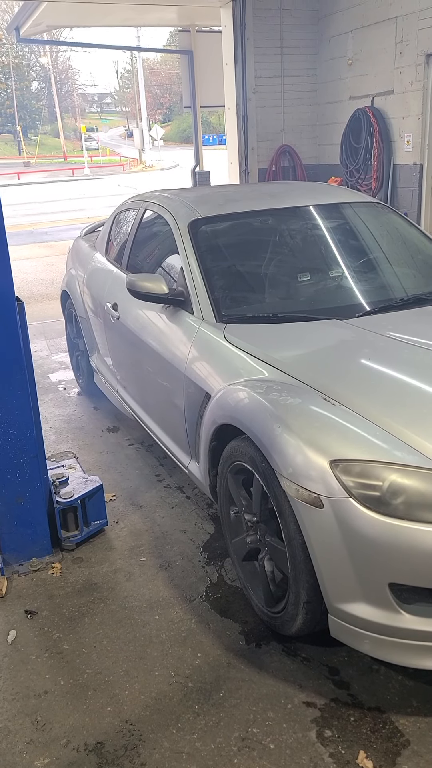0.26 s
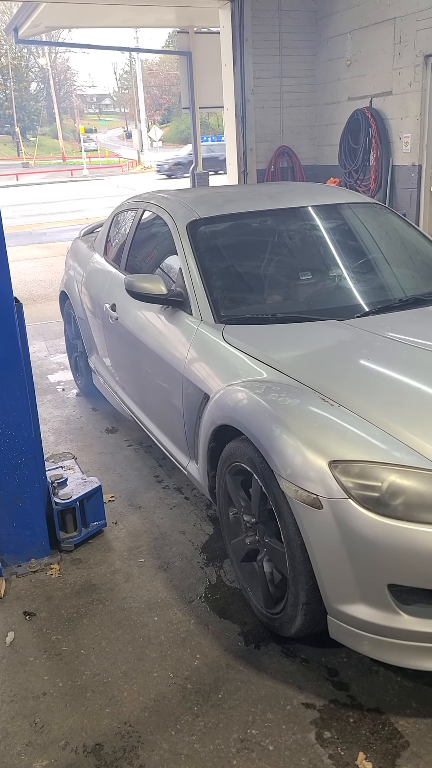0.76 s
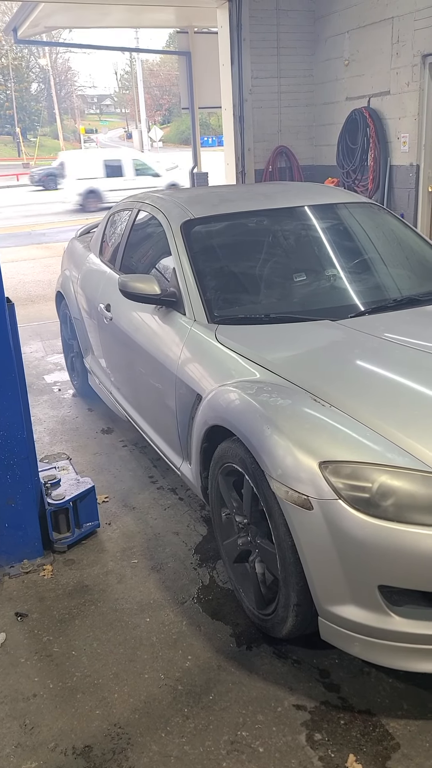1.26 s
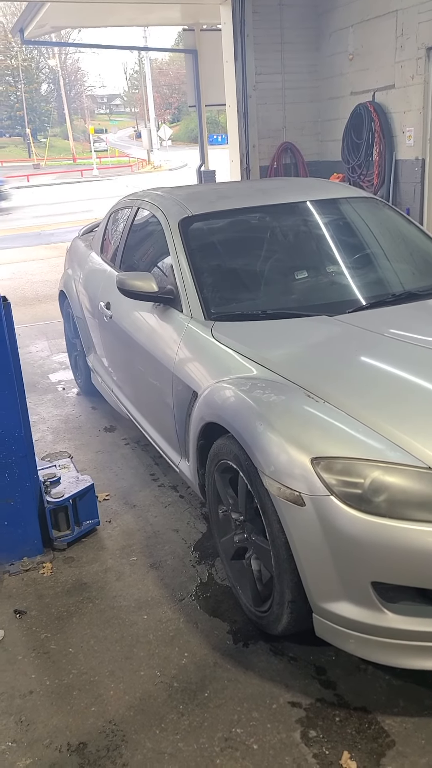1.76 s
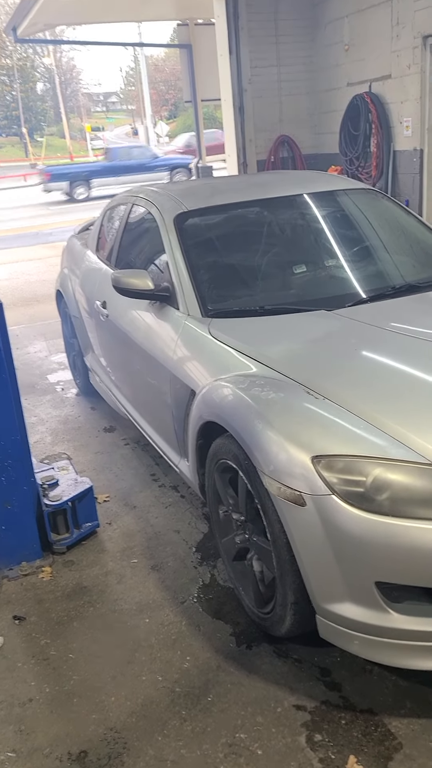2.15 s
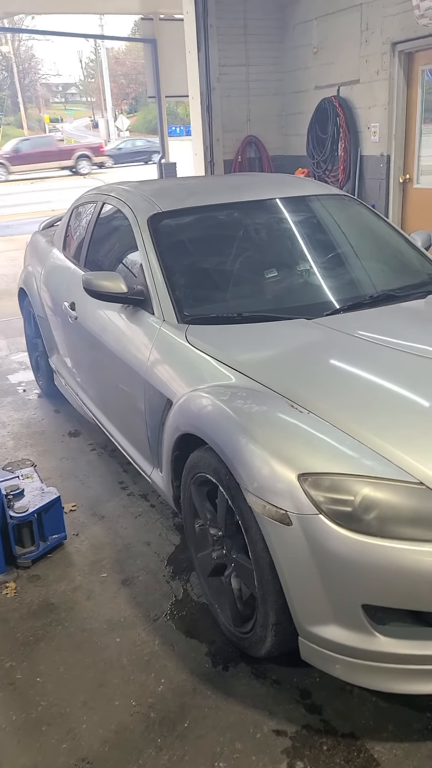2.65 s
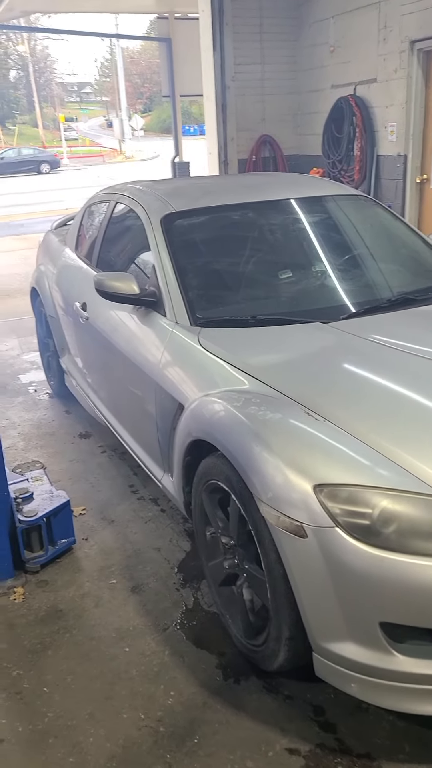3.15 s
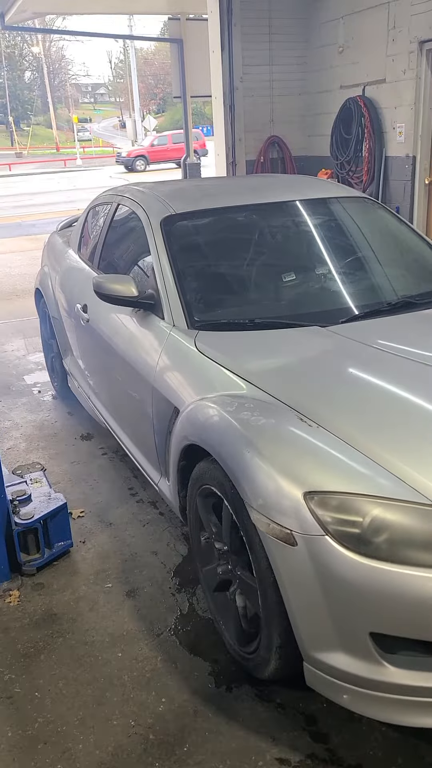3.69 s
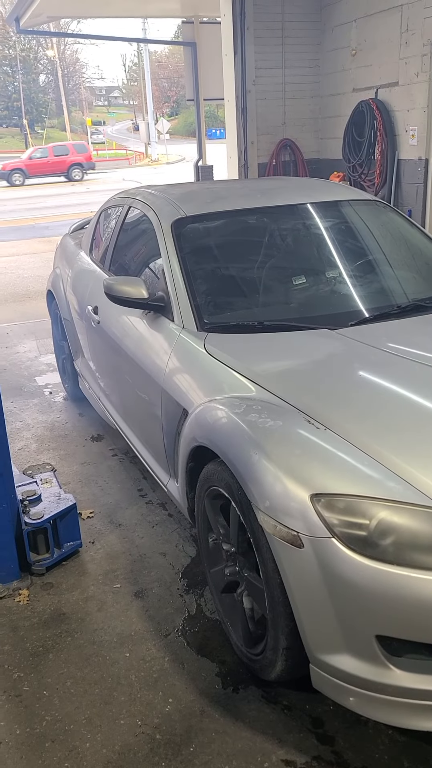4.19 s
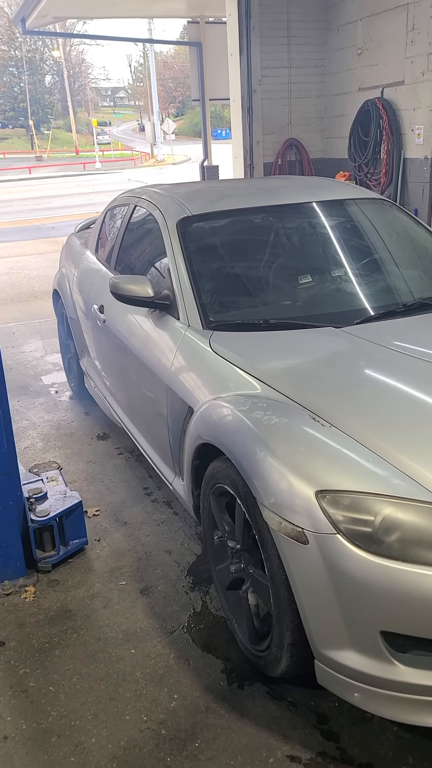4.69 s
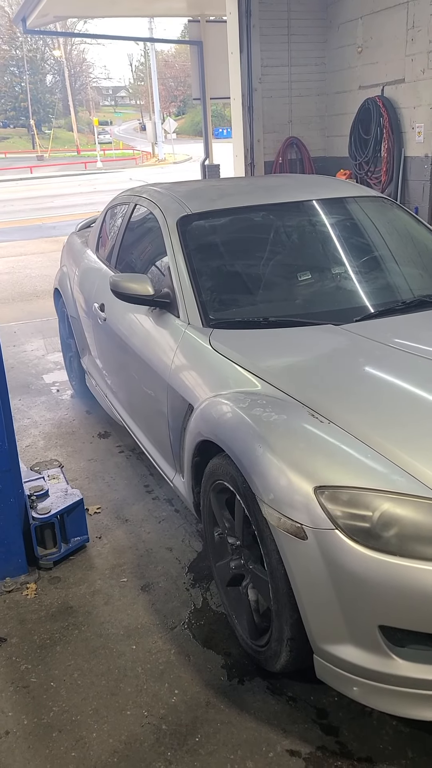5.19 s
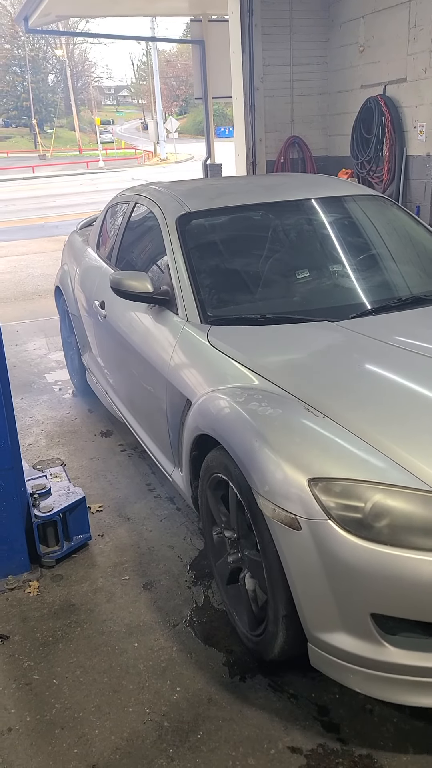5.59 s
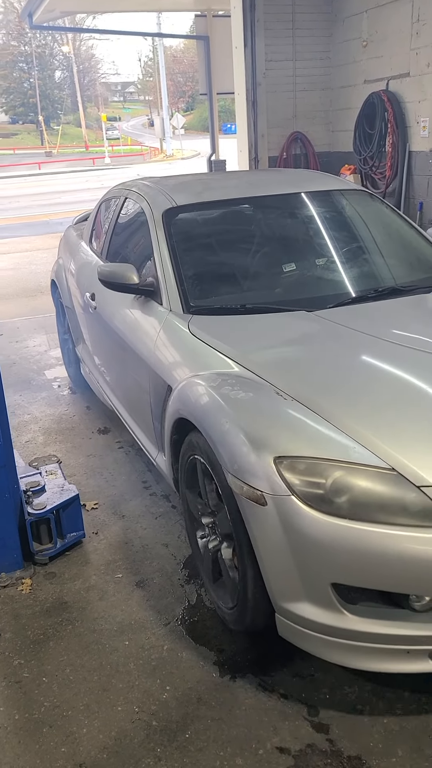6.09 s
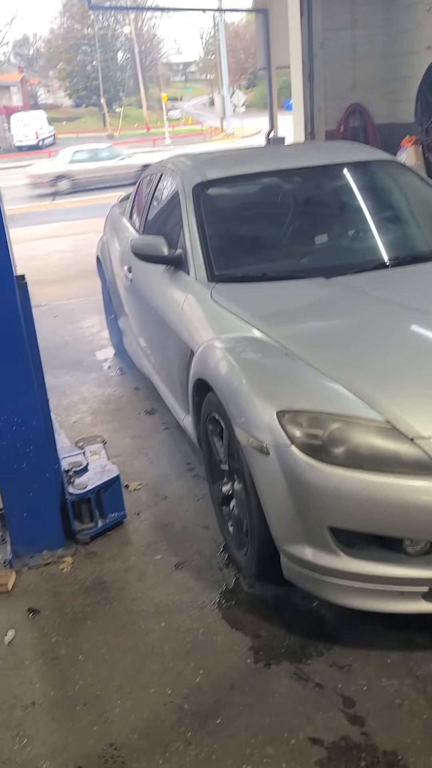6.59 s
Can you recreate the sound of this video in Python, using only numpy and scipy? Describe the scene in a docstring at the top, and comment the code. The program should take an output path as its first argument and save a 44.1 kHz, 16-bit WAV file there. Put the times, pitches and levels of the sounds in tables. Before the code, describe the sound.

A rotary car engine drones at fast idle in an echoing workshop, sags almost to a stall, then catches and settles into a throbbing low idle.

```python
"""A car engine with two rotors is heard at fast idle in a workshop with its door open.
The revs sag until it nearly stalls, then it catches itself and settles into a throbbing low idle.
Each firing sends a puff through the muffler, a sharp edge through the pipe and a burst of rough gas.
These are sums of tones and shaped noise; rushing air, clatter and rumble are noise, a belt adds a whine.
Engine speed times most layers, and the air drawn by the engine sets many of their levels."""
import sys
import numpy as np
from scipy import signal
from scipy.fft import rfft, irfft, next_fast_len
from scipy.io import wavfile
from scipy.ndimage import uniform_filter1d

SR = 44100
rng = np.random.default_rng(int(sys.argv[2]) if len(sys.argv) > 2 else 0)


def to_wav(sig):
    """Store sig (one row per channel, or 1-D mono) as 16-bit WAV at the path in sys.argv[1].

    Samples outside -1..1 are clipped; the rate is SR.
    """
    pcm = np.clip(np.atleast_2d(sig), -1, 1) * 32767
    pcm = np.round(pcm).astype(np.int16)
    wavfile.write(sys.argv[1], SR, pcm.T)  # frames by channels


N = 301644


def from_db(db):
    """Turn decibels into gain."""
    return 10 ** (np.asarray(db) / 20)


def rms_one(x):
    """Scale a sound to rms 1."""
    return x / np.sqrt(np.mean(x ** 2) + 1e-20)


def in_time(rows):
    """Read each column of a time table at every sample."""
    s, *columns = np.transpose(rows)
    return [np.interp(np.arange(N) / SR, s, c) for c in columns]


def at_hz(points, hz):
    """Read each column of a spectrum table on a log-frequency axis."""
    knots, *columns = np.transpose(points)
    return np.array([np.interp(np.log(hz + 1e-3), np.log(knots), c) for c in columns])


def bumps(rows, hz):
    """Add up the gains in dB of a table of peaks and dips."""
    return sum(peak_db / (1 + (2 * (hz - centre) / width) ** 2) for centre, peak_db, width in rows)


def per_firing(turn):
    """Draw a fresh random value for each firing, joined by straight lines."""
    return np.interp(turn + 1, np.arange(400), rng.standard_normal(400))


def wander(per_s, size=1):
    """Drift slowly at random, with new values per_s times a second, read at every size-th sample."""
    return np.interp(np.arange(0, N, size) / SR * per_s, np.arange(400), rng.standard_normal(400))


def puff(turn, sharpness):
    """Gas flow that jumps at each firing and dies away before the next; rms 1."""
    return rms_one(np.exp(-sharpness * (turn % 1)))


def lag_of(hz, centre_hz, width_hz):
    """Phase lag of a resonance: almost none well below it, nearly half a cycle well above it."""
    return np.arctan2(hz * width_hz, centre_hz ** 2 - hz ** 2)


# How alike the left and right channels are: (frequency [Hz], likeness [-1 to 1])
CHANNEL_LIKENESS = [(100, 0.4), (280, 1), (500, 0.6), (1000, -.1), (2500, 0)]
# Peaks and dips that the bonnet and the floor give to all noise:
# (frequency [Hz], gain [dB], width [Hz])
BONNET_REFLECTIONS = [(995, -6.5, 36), (1824, 3.5, 105), (2020, -6.5, 110), (2450, 2.5, 65), (3950, 1, 420),
                      (2580, -1, 230), (3120, 1.5, 250), (4710, 3.5, 140), (5330, 2.5, 260),
                      (5960, 0.5, 500), (7200, 3, 310)]
RIPPLE_DB, RIPPLE_STEP_HZ = 2.2, 30


def coloured_noise(spectrum):
    """Stereo noise of a given colour, finely rippled by wall echoes; rms 1."""
    size = next_fast_len(N)
    hz = np.arange(size // 2 + 1) * SR / size
    mid, side = rfft(rng.standard_normal((2, size)))
    alike = np.clip(at_hz(CHANNEL_LIKENESS, hz), -1, 1)
    both = np.sqrt(1 + alike) * mid + np.sqrt(1 - alike) * side * [[1], [-1]]
    ripple = np.interp(hz / RIPPLE_STEP_HZ, np.arange(1000), rng.standard_normal(1000))
    ripple = ripple * np.interp(hz, [500, 1200, 4000, 9000], [0, 1, 1, .4])
    colour_db = at_hz(spectrum, hz) + bumps(BONNET_REFLECTIONS, hz) + RIPPLE_DB * ripple
    return rms_one(irfft(both * from_db(colour_db), size)[:, :N])


# Engine speed: (time [s], firing rate [firings per s])
ENGINE_SPEED = [(0.0, 49.06), (0.2, 48.74), (0.55, 46.77), (0.85, 46.57), (1.1, 47.67), (2.15, 48.48),
                (2.4, 47.51), (2.55, 43.8), (2.7, 35.45), (2.85, 28.35), (3.05, 23.1), (3.2, 24.85),
                (3.45, 27.6), (3.75, 30.38), (4.0, 31.7), (4.4, 30.79), (4.8, 30.87), (5.3, 31.27),
                (5.85, 31.21), (6.3, 31.47), (6.84, 31.44)]
IDLE_RATE, FAST_RATE = 31, 47   # firings per s


def engine_motion():
    """Add up the speed into a count of firings; find how fast it idles and how quickly its revs change."""
    rate, = in_time(ENGINE_SPEED)
    turn = np.cumsum(rate) / SR - .587   # one turn per firing
    flow = np.clip((rate - IDLE_RATE) / (FAST_RATE - IDLE_RATE), 0, 1)   # 0 at low idle, 1 at fast idle
    rev_change = uniform_filter1d(np.abs(np.gradient(rate)) * SR, size=6000)   # firings per s, per s
    stumble = np.tanh((rev_change / 18) ** 2)   # 0 at steady revs, near 1 when they change fast
    return turn, rate, flow, stumble


# Air drawn by the engine: (time [s], relative level [dB])
AIR_DRAWN = [(0.06, -41), (0.97, -44), (1.72, -42), (2.31, -43.5), (2.35, -40.5), (2.69, -45.5),
             (2.84, -55), (3.12, -49), (3.28, -42.5), (3.69, -38.5), (6.75, -37.5)]


def air_drawn():
    """The flow of air in dB, which sets hiss, clatter, rasp, gas bursts and whine."""
    air_db, = in_time(AIR_DRAWN)
    return air_db


# Rumble of the workshop and the street outside: (frequency [Hz], relative level [dB])
RUMBLE_COLOUR = [(20, -39), (45, -21), (100, -72), (220, -8), (400, -5), (800, -31.5), (1600, -20),
                 (5000, -95)]


def rumble():
    """Steady, mostly low noise from the workshop and the street."""
    return from_db(-44) * coloured_noise(RUMBLE_COLOUR)


ROOM_T60_S = .7   # time for the echoes to fall by 60 dB


def room_tail(x):
    """The workshop rings on, as fading noise-like echoes, at pitches that the engine has just left."""
    t = np.arange(int(ROOM_T60_S * SR)) / SR
    response = rng.standard_normal(len(t)) * from_db(-60 * t / ROOM_T60_S)
    return signal.fftconvolve(x, response[None] / np.linalg.norm(response), axes=1)[:, :N]


# Whine of a belt-driven accessory: (multiple of its own rate, level at the strongest air flow [dB])
BELT_WHINE = [(2, -57.5), (3, -65)]
WHINE_PER_FIRING = 11.71   # accessory cycles per firing


def whine(turn, slip):
    """Faint tones of an accessory on a slightly slipping belt, with another phase on each side."""
    angle = 2 * np.pi * (WHINE_PER_FIRING * turn + slip * wander(per_s=12.0))
    sides = np.array([[0], [1]])   # phase [radians]
    return sum(np.sqrt(2) * from_db(db) * np.cos(k * angle + sides) for k, db in BELT_WHINE)


# Colour of the rushing air: (frequency [Hz], left relative level [dB], right relative level [dB])
AIR_COLOUR = [(1380, 10, 6), (1870, -8, 1.5), (2290, -2, 0), (2920, -2.5, -2.5), (4210, -0.5, 0.5),
              (4800, -4.5, -3), (6400, -1.5, -6), (7900, -1, -3), (9230, -6, 4.5), (11240, 0, -1.5),
              (12000, -15, 6.5), (12800, 2.5, -5.5), (13900, -7, -1), (15200, -3, -2)]


def hiss(turn, level_db, throb_db, edge_db, flutter_db, low_hz, dull_hz):
    """Air rushing through the engine, pulsing slightly with every stroke; weaker flow is duller."""
    pulsing_db = throb_db * np.cos(2 * np.pi * (turn - .35))
    pulsing_db += edge_db * np.cos(4 * np.pi * (turn - .25))
    pulsing_db += flutter_db * per_firing(turn)
    air = rms_one(high_pass(coloured_noise(AIR_COLOUR), low_hz) * from_db(pulsing_db))
    dull = signal.sosfilt(signal.butter(1, dull_hz, fs=SR, output="sos"), air)
    treble = air - dull
    return from_db(level_db) * (dull + from_db(level_db - level_db.max()) * treble)


def high_pass(x, hz):
    """Cut the lows steeply."""
    return signal.sosfilt(signal.butter(4, hz, "high", fs=SR, output="sos"), x)


# Engine-bay clatter: (frequency [Hz], relative level [dB])
CLATTER_COLOUR = [(150, 18), (450, 7.5), (900, 8), (1050, 7), (1250, 10), (1550, -6), (1800, 1),
                  (2030, 0.5), (2400, 2), (3200, -12), (5000, -25)]


def clatter(turn, throb, grain_db):
    """Mechanical noise of the engine bay, grainy and beating with the firings; rms 1."""
    count = N // 128 + 2   # a new grain every 128 samples
    grains = np.interp(np.arange(N) / 128, np.arange(count), rng.standard_normal(count))
    beat = 1 + throb * puff(turn, sharpness=1.6)
    return rms_one(coloured_noise(CLATTER_COLOUR) * beat * from_db(grain_db * grains))


# Swelling and sinking of the low treble: (time [s], gain [dB])
TREBLE_SWELL = [(0, -2), (.9, 1), (1.9, -1), (2.9, 0.5), (3.5, 1.5), (4.2, -0.5), (5.1, 1.5), (5.7, -2.5),
                (6.3, -0.5), (6.84, 0)]
SWELL_LOW_HZ, SWELL_HIGH_HZ = 1900, 4500


def swell(x):
    """Raise and lower the low treble of the engine-bay noise slowly."""
    swell_db, = in_time(TREBLE_SWELL)
    band_pass = signal.butter(1, [SWELL_LOW_HZ, SWELL_HIGH_HZ], "band", fs=SR, output="sos")
    return x + (from_db(swell_db) - 1) * signal.sosfilt(band_pass, x)


# Colour of the rough gas at the tailpipe: (frequency [Hz], relative level [dB])
GAS_COLOUR = [(150, -28), (300, -6), (470, 6.5), (600, -7.5), (800, -1), (1200, -10.5), (3000, -30)]
# Strength of the gas bursts, before the air flow's swing: (time [s], level [dB])
GAS_LEVEL = [(0, -53), (.4, -53), (1, -39), (2.3, -60), (2.5, -45), (2.72, -46), (2.95, -40), (3.25, -41),
             (3.85, -41), (4.5, -46.5), (6.84, -46.5)]


def chuff(turn, lead, sharpness, uneven_db):
    """A short burst of turbulence at the front of each pulse, each with a strength of its own."""
    level_db, = in_time(GAS_LEVEL)
    strength = from_db(uneven_db * np.clip(per_firing(np.floor(turn + lead)), -2, 2))
    bursts = rms_one(strength * puff(turn + lead, sharpness))
    return from_db(level_db) * coloured_noise(GAS_COLOUR) * bursts


# Half orders, there because the two rotors differ: (frequency [Hz], relative level of a partial [dB])
ROTOR_HALF_ORDERS = [(47, -92), (77, -39.5), (110, -48), (140, -49), (171, -48), (205, -54), (234, -37),
                     (265, -46), (296, -59), (318, -42.5), (359, -61), (390, -57), (421, -49.5), (452, -57),
                     (483, -51), (578, -60), (606, -48.5), (644, -55), (668, -53.5), (700, -53), (732, -51),
                     (765, -70), (830, -54.5), (940, -64), (1010, -71), (1095, -62.5), (1600, -97)]


def lope(turn, rate, flow, fast_db, count=8):
    """Low half orders: tones between the firing harmonics, as one rotor fires unlike the other."""
    out = 0
    for k in np.arange(1, count) + .5:
        level = from_db(at_hz(ROTOR_HALF_ORDERS, k * rate))
        out = out + level * np.cos(2 * np.pi * k * turn + rng.uniform(-np.pi, np.pi))
    return np.sqrt(2) * from_db(fast_db * flow) * out


# Upper whole orders, with peaks at the pipe's resonances: (frequency [Hz], relative level of a partial [dB])
PIPE_RESONANCES = [(205, -28), (240, -33.5), (265, -46.5), (282, -39.5), (312, -38), (343, -46.5),
                   (376, -42), (405, -65), (437, -48.5), (470, -45.5), (499, -62), (565, -50.5),
                   (625, -60.5), (760, -60.5), (860, -56), (965, -58), (1020, -68.5), (1600, -92)]
# A standing wave lifts or lowers the upper partials near one pitch:
# (time [s], frequency [Hz], gain [dB])
SINGING_PARTIAL = [(0.5, 490, 2.5), (0.9, 490, 8), (1.15, 500, -1), (1.6, 600, 4), (2.3, 610, 3),
                   (2.6, 603, -2), (4.1, 603, -2), (5.0, 607, 2), (5.95, 606, 4), (6.12, 644, 10),
                   (6.45, 645, 10), (6.84, 645, 7)]
SINGING_WIDTH_HZ = 25


def rasp(turn, rate, flow, stumble, jitter, bright_db, uneven_db, swell_db, diffuse_hz, width,
         count=76, size=10):
    """The sharp edge of each pulse: upper whole and half orders, coloured by the pipe."""
    strength = from_db(uneven_db * per_firing(turn))
    turn = turn + jitter * per_firing(turn)   # uneven timing blurs the highest partials most
    curves = (turn, rate, flow, stumble, *in_time(SINGING_PARTIAL))
    turn, rate, flow, stumble, singing_hz, singing_db = (c[::size] for c in curves)   # coarser, for speed
    out = 0
    for half in range(17, count):
        hz = half / 2 * rate
        diffuse = np.clip((hz / diffuse_hz) ** 3 + stumble, 0, 1)   # wall echoes scramble the higher partials
        lift_db = bumps([(singing_hz, singing_db, SINGING_WIDTH_HZ)], hz)
        # a strong standing wave is alike on both sides
        apart = width * rng.uniform(-1.08, 1) * from_db(-np.maximum(lift_db, 0))
        scramble = rng.uniform(-np.pi, np.pi) + apart * np.array([[1], [-1]])
        table = ROTOR_HALF_ORDERS if half % 2 else PIPE_RESONANCES
        level_db = at_hz(table, hz) + bright_db * flow * diffuse
        level_db = level_db + swell_db * wander(per_s=1.92, size=size)   # each partial drifts in level
        out = out - from_db(level_db + lift_db) * np.cos(np.pi * half * (turn - 1) + diffuse * scramble)
    return strength * signal.resample_poly(out, size, 1, axis=1)[:, :N]


# Colour of a soft pulse behind the muffler: (frequency [Hz], relative level of a partial [dB])
MUFFLER_COLOUR = [(30, -80.5), (55, -36.5), (75, -26), (100, -30.5), (160, -27), (220, -36), (300, -49.5),
                  (390, -71)]
# Exhaust pulses: (time [s], level [dB], hardness above HARD_FROM_HZ [dB per octave],
# bass gain below HARD_FROM_HZ [dB])
EXHAUST_PULSES = [(0, 7.8, 3, -14.5), (.4, -2.7, 18.5, -2), (1, 0, 17, -2), (2, -1, 15, 0),
                  (2.35, -1, 15, -0.5), (2.5, -1, 13.3, -2.4), (2.7, -4.4, 10.5, 3.2), (2.87, -6, 9, -1),
                  (3.08, -7.5, 2, 7), (3.25, -6.5, -0.5, 6.5), (3.55, -5, 7.5, 4.5), (4, -3.26, 3.5, 4),
                  (5.5, -2.84, 4.5, 2.9), (6.84, -5, -.7, 9)]
HARD_FROM_HZ = 120
MUFFLER_HZ, MUFFLER_WIDTH_HZ, MUFFLER_DELAY_TURNS = 75, 16, .027
TAILPIPE_HZ, TAILPIPE_WIDTH_HZ = 160, 80
UNEVEN_DB, JITTER_TURNS = .25, .003   # spread from firing to firing at steady revs
STUMBLE_ROUGHENS = 5   # a full stumble multiplies that spread by 1 + 5


def boom(turn, rate, flow, stumble, spread, count=8):
    """Low orders of the exhaust pulses behind the muffler; at high flow the tailpipe rings too."""
    level_db, hardness, bass_db = in_time(EXHAUST_PULSES)
    rough = 1 + STUMBLE_ROUGHENS * stumble
    strength = from_db(level_db + UNEVEN_DB * rough * per_firing(turn))
    angle = 2 * np.pi * (turn - MUFFLER_DELAY_TURNS + JITTER_TURNS * rough * per_firing(turn))
    out = np.zeros((2, N))
    for k in range(1, count + 1):
        hz = k * rate
        order_db = at_hz(MUFFLER_COLOUR, hz) + hardness * np.log2(np.maximum(hz / HARD_FROM_HZ, 1))
        order_db += bass_db * np.interp(hz / HARD_FROM_HZ, [.4, .6, .8, 1], [0, 1, 1, 0])
        lag = lag_of(hz, MUFFLER_HZ, MUFFLER_WIDTH_HZ)
        lag = lag + flow * lag_of(hz, TAILPIPE_HZ, TAILPIPE_WIDTH_HZ)
        apart = spread * hz / MUFFLER_HZ * (-1) ** k   # standing waves shift the phase between the sides
        out += np.sqrt(2) * from_db(order_db) * np.cos(k * angle - lag + apart * [[1], [-1]])
    return out * strength


# Standing waves of the workshop at the listening spot:
# (frequency [Hz], gain over the direct sound [dB], width [Hz], polarity [+1 or -1])
WORKSHOP_MODES = [(36.2, 11.5, 9, 1), (83.8, 9.5, 13.1, 1), (102.2, 13, 8.6, 1), (106.9, 5, 2.9, -1),
                  (115.2, 15, 10, -1), (122.6, 14.5, 5.43, 1), (134.6, 11.5, 7.5, 1), (136.9, 15, 5.1, -1),
                  (144.6, 5.5, 2.7, 1), (157.16, 7, 2.9, 1), (195.3, -4.5, 18, -1), (220.1, 9.5, 3.03, 1),
                  (256.4, 1, 4.5, -1), (275, -11.5, 3.8, -1), (279.5, 1, 6.6, -1), (287.8, -4, 3.4, -1),
                  (326.4, 10.5, 4.06, -1), (337, 3.5, 3.2, 1), (357.6, 15, 9, -1), (386.5, 4.6, 8.4, -1)]


def standing_waves(x):
    """Direct sound plus the room's modes, which build up and ring on as the orders glide through them."""
    first_firing = x[:, :round(SR / ENGINE_SPEED[0][1])]
    run_in = np.tile(first_firing, 20)   # the engine is already running
    drive, out = np.hstack([run_in, x]), x.copy()
    for hz, db, width_hz, polarity in WORKSHOP_MODES:
        r = np.exp(-np.pi * width_hz / SR)
        resonator = [1, -2 * r * np.cos(2 * np.pi * hz / SR), r * r]
        mode = signal.lfilter([1, 0, -1], resonator, drive) * (1 - r * r) / 2
        out += np.sign(polarity) * from_db(db) * mode[:, -N:]
    return out


def scene():
    """Engine speed times the layers and air flow sets levels; firing roughens while the revs change."""
    turn, rate, flow, stumble = engine_motion()
    air_db = air_drawn()
    swing_db = air_db - air_db.mean()
    follow_db = 0.55 * swing_db   # rasp and gas follow this share of the air's swing

    belt = from_db(air_db - air_db.max()) * whine(turn, slip=0.024)
    air = hiss(turn, air_db + 5.5, throb_db=1.0, edge_db=0.47, flutter_db=1.0, low_hz=1850, dull_hz=9500)
    # the slack in the engine rattles less at fast idle
    clatter_db = -37 + 0.33 * swing_db - 5.5 * flow
    bay = from_db(clatter_db) * clatter(turn, throb=0.13, grain_db=2.5)
    gas = from_db(follow_db) * chuff(turn, lead=.07, sharpness=5.7, uneven_db=3.0)
    rotors = lope(turn, rate, flow, fast_db=2.0)
    jitter = 0.0025 + 0.003 * flow + 0.041 * stumble   # turns
    pipe = from_db(3 + follow_db - 1.3 * stumble) * rasp(
        turn, rate, flow, stumble, jitter, bright_db=3.5, uneven_db=1.32, swell_db=2.2,
        diffuse_hz=556, width=1.44)
    exhaust = standing_waves(boom(turn, rate, flow, stumble, spread=0.049))
    # the tail is added only while the revs change
    room = from_db(-13) * stumble ** 2 * room_tail(exhaust + pipe + gas)
    return rumble() + room + belt + swell(bay + air) + gas + rotors + pipe + exhaust


def record(dry):
    """Cut the top steeply above 15700 Hz."""
    return signal.sosfilt(signal.ellip(18, .1, 100, 15700, fs=SR, output="sos"), dry)


dry = scene()
out = record(dry)
to_wav(out)
```